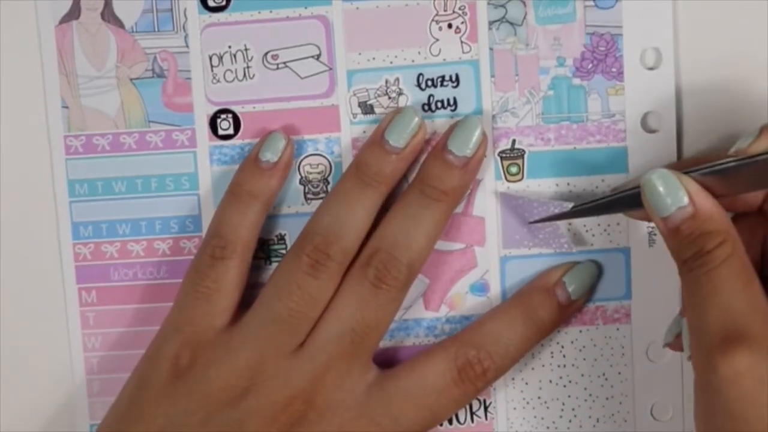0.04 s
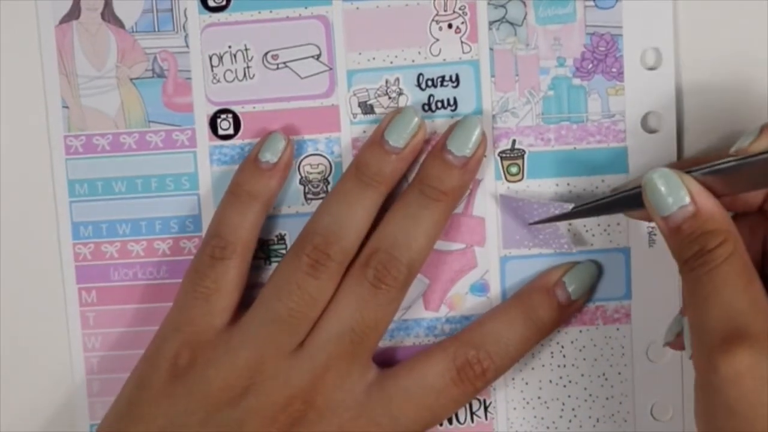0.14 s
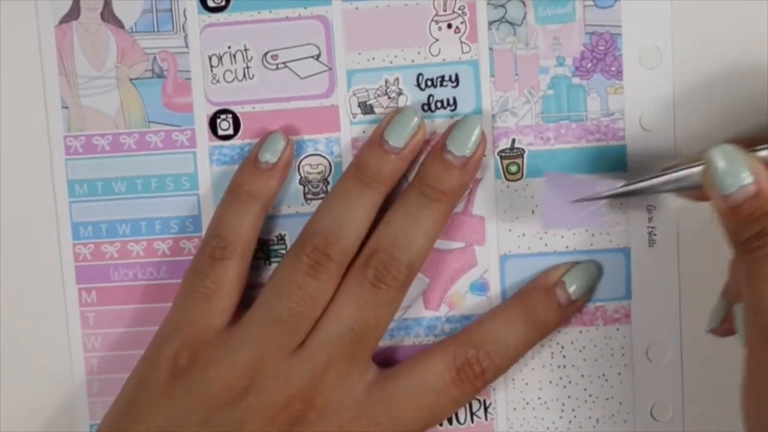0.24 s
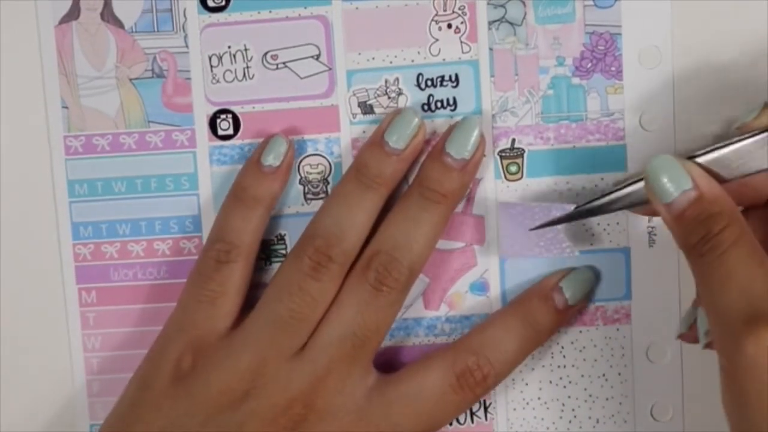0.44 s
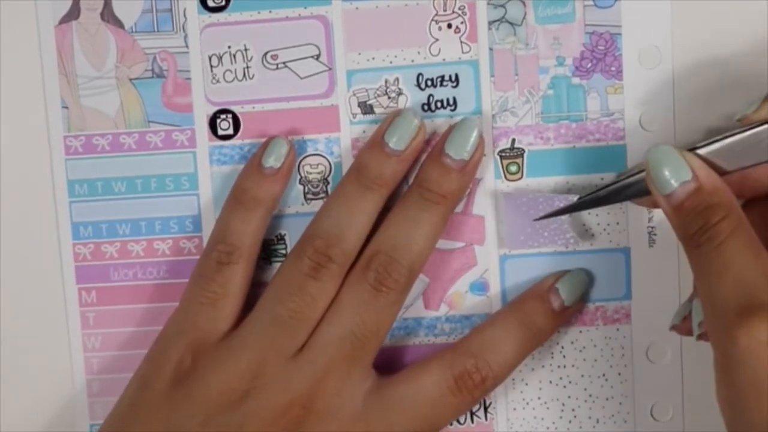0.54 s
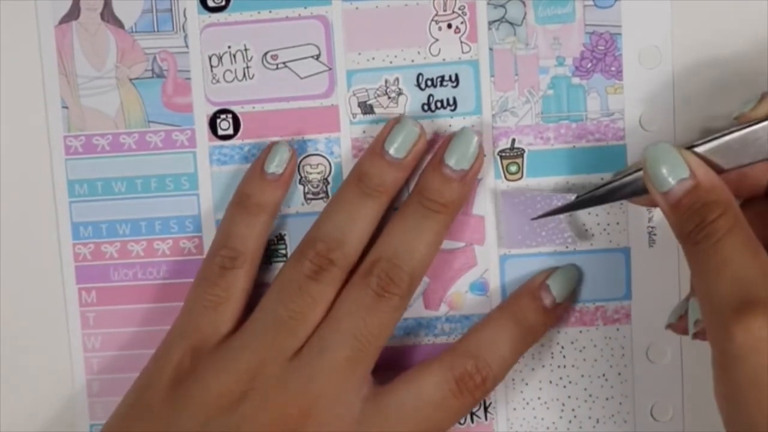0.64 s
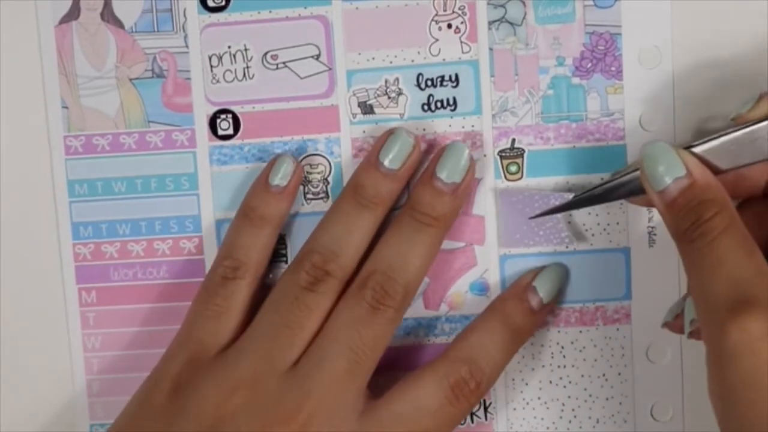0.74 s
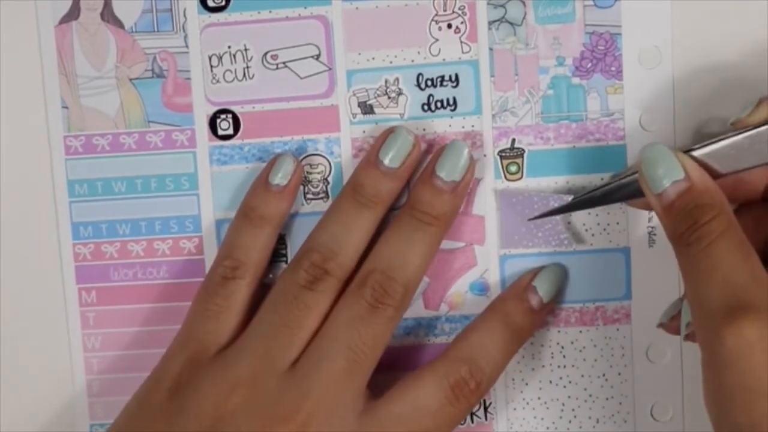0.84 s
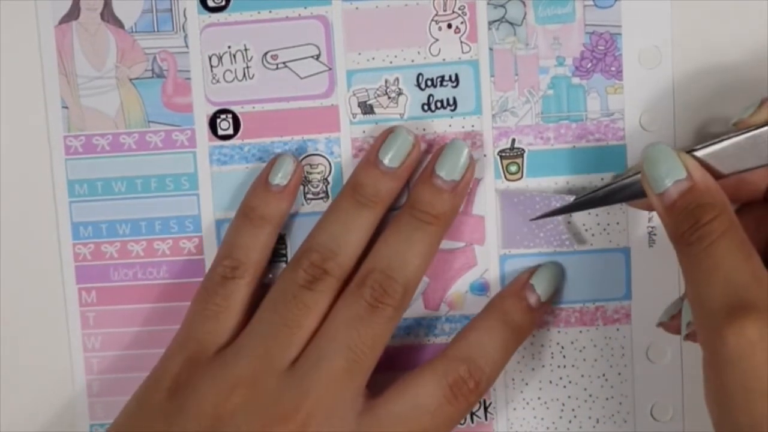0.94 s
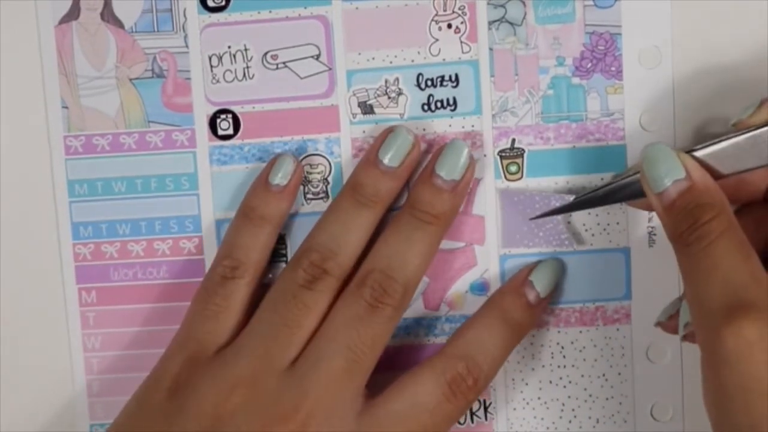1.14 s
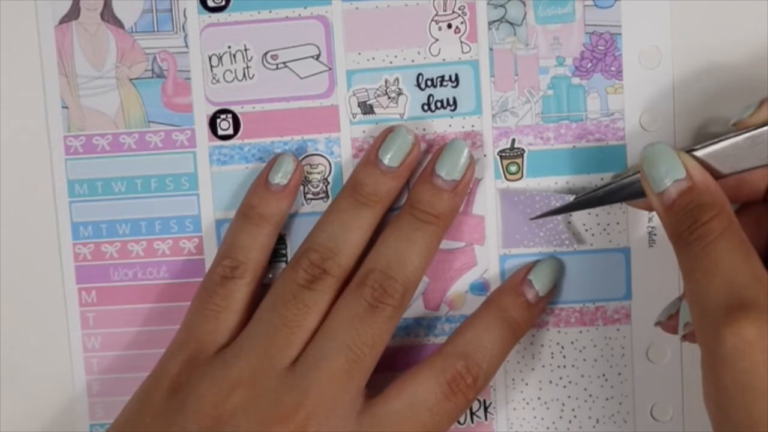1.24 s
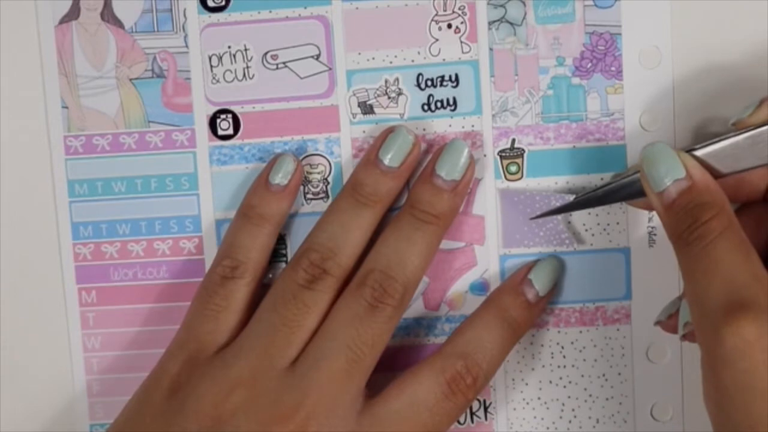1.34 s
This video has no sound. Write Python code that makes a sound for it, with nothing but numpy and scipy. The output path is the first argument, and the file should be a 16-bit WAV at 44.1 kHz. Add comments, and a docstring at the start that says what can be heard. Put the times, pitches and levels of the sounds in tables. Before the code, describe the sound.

Metal tweezers snap sharply after a sticker peels with tiny ticks and a soft rustle; the click rings briefly in a quiet room, then a faint slide and two light page taps follow, miked close.

```python
"""Tweezers and a planner sticker

Metal tweezers work a small sticker on a planner page, close to the microphone in a quiet room.
The sticker peels in tiny ticks and a rustle; one sharp, chattering snap rings the room and overloads the recorder.
Then the sticker slides with a faint squeak, the tips touch the page twice, and three fainter touches follow.
Contacts are ringing modes with noise cracks, rubs are dense noise grains; hum and hiss lie underneath."""
import sys
import numpy as np
from scipy import signal
from scipy.fft import rfft, irfft
from scipy.io import wavfile

SR = 44100
rng = np.random.default_rng(int(sys.argv[2]) if len(sys.argv) > 2 else 0)


def wrap_up_sound(samples):
    """Save the sound to the file named by the first command line argument, as 16-bit audio."""
    columns = np.atleast_2d(samples).T
    # keep every value between -1 and 1, then stretch to whole-number steps
    tamed = np.clip(columns, -1, 1)
    steps = np.round(tamed * 32767).astype(np.int16)
    wavfile.write(sys.argv[1], SR, steps)


N = 61739
TIME = np.arange(N) / SR  # s
BINS = np.maximum(np.arange(N + 1) * SR / (2 * N), 1)  # Hz, for a spectrum of 2 * N samples


def from_db(db):
    """Decibels to amplitude gain."""
    return 10 ** (np.asarray(db) / 20)


def rms_one(x):
    """Scale to unit rms over all channels."""
    return x / np.sqrt(np.mean(x ** 2) + 1e-20)


def at_hz(points, hz):
    """Read a table on a log-frequency axis."""
    freqs, values = np.transpose(points)
    return np.interp(np.log(hz), np.log(freqs), values)


def coloured(x, spectrum):
    """Filter a noise by a spectrum in dB; unit rms."""
    shaped = rfft(x, 2 * N) * from_db(at_hz(spectrum, BINS))
    return rms_one(irfft(shaped)[..., :N])


def stereo_noise(correlation):
    """White noise whose two channels have the given correlation, mixed from mid and side noises."""
    mid, side = rfft(rng.standard_normal((2, 2 * N)))
    correlation = np.clip(correlation, -1, 1)
    shared = np.sqrt(1 + correlation) * mid
    opposed = np.sqrt(1 - correlation) * side * [[1], [-1]]
    return rms_one(irfft(shared + opposed)[:, :N])


def dying(t60):
    """An exponential decay from 1, falling 60 dB in t60 seconds."""
    return np.exp(-np.log(1000) * TIME / max(t60, 1e-4))


def convolve(x, response):
    """Pass a sound through a mono or stereo response."""
    return signal.fftconvolve(np.atleast_2d(x), np.atleast_2d(response), axes=1)[:, :N]


def pan(db):
    """Channel gains for a left-minus-right level."""
    return from_db(np.array([[.5], [-.5]]) * db)


def low_cut(x, hz):
    """Second-order high-pass: small things radiate little bass."""
    sos = signal.butter(2, hz, "high", fs=SR, output="sos")
    return signal.sosfilt(sos, x + 1e-18)


def clicks(times, db):
    """One impulse for each contact."""
    out = np.zeros(N)
    samples = np.clip(np.round(times * SR).astype(int), 0, N - 1)
    np.add.at(out, samples, from_db(db))
    return out


def ringing(modes):
    """A body's modes after one unit blow: decaying sines."""
    return sum(from_db(db) * dying(t60) * np.sin(2 * np.pi * hz * TIME) for hz, db, t60 in modes)


def contacts(events, modes, crack, low_cut_hz, crack_db, crack_t60, correlation):
    """Each contact rings the body's modes and gives off a brief crack of coloured noise."""
    s, db, treble_db = np.transpose(events)
    ring = convolve(clicks(s, db), ringing(modes))
    crack_envelope = convolve(clicks(s, db + treble_db + crack_db), dying(crack_t60))
    crack_noise = coloured(stereo_noise(correlation), crack)
    return low_cut(ring + crack_envelope * crack_noise, low_cut_hz)


def rubbing(strokes, colour, grains_per_s, grain_spread_db, correlation):
    """Paper fibres catch and slip in dense tiny grains under strokes that swell and fade."""
    sizes = from_db(grain_spread_db * np.minimum(rng.exponential(1, N), 4))
    caught = rng.random(N) < grains_per_s / SR
    grains = caught * sizes * stereo_noise(correlation)
    pressure = sum(from_db(db) * np.interp(TIME, [start, top, end], [0, 1, 0])
                   for start, top, end, db in strokes)
    return pressure * coloured(grains, colour)


def snap():
    """The tweezers come free with a hard, chattering click and knock the desk."""
    # tips chattering free: start_s, level_db (of the blow), treble_db (crack only)
    chatter = [(.22838, -1, 0), (.23000, -13, 7), (.23096, -.5, -2), (.23326, -5, -1)]
    # tweezers against the page: pitch_hz, relative_level_db, t60_s
    tweezer_modes = [(1100.6, -36.5, .008), (1310, -30, .016), (2420, -23.5, 0.00807), (2780, -9.5, 0.03),
                     (3044, -10, .009), (3336, 1.5, .0045), (3760, -4, .006), (4075, -23, 0.012),
                     (5040, -28, 0.0024)]
    # spectrum of the crack: frequency_hz, relative_db_per_hz
    crack = [(200, -23.5), (700, -5), (1400, 1.5), (3500, 6), (6000, -10), (8000, -6.5), (11000, -8.5),
             (15000, -8.5)]
    # the desk's knock: pitch_hz, relative_level_db, t60_s
    desk_modes = [(280, -33.5, .25), (349, -39, 0.051)]
    click = from_db(0.08) * contacts(chatter, tweezer_modes, crack, low_cut_hz=1900,
                                     crack_db=-8.5, crack_t60=0.014, correlation=0.067)
    s, db, _ = np.transpose(chatter)
    knock = low_cut(convolve(clicks(s, db), ringing(desk_modes)), hz=230)
    return pan(-1.3) * click + knock


def peeling():
    """The glue lets go in small jerks that tick, and the lifting paper rustles."""
    # jerks of the glue: start_s, level_db (before the gain below), treble_db (crack only)
    jerks = [(.0142, -46, 0), (.0318, -32, -3), (.0630, -42, 3), (.0750, -36, -7), (.1003, -34, -3),
             (.1074, -31, -2), (.1371, -31, 0), (.1598, -38, 0), (.1617, -34, 1), (.1640, -40, 1),
             (.1775, -34, -4), (.1972, -29, 1), (.2032, -41, 0)]
    # the sticker's ring: pitch_hz, relative_level_db, t60_s
    sticker_modes = [(2838, -11, 0.018), (3700, -0.5, 0.0013), (5100, -20, 0.009)]
    # spectrum of the crack: frequency_hz, relative_db_per_hz
    crack = [(500, -13), (2000, -19), (4000, 1), (6500, -13), (8000, -3.5), (10500, -0.5), (12500, -9.5),
             (15500, -5)]
    # paper rubbing: start_s, top_s, end_s, level_db (before panning)
    strokes = [(.02, .165, 0.29, -50)]
    # spectrum of the rustle: frequency_hz, relative_db_per_hz
    colour = [(300, -15), (2000, -5.5), (2750, 9.5), (4000, -1), (6500, -8.5), (9800, 4), (12500, -17),
              (15500, -9)]
    ticks = from_db(2.0) * contacts(jerks, sticker_modes, crack, low_cut_hz=2400,
                                    crack_db=-7, crack_t60=.011, correlation=0.39)
    rustle = rubbing(strokes, colour, grains_per_s=5000, grain_spread_db=2.2, correlation=0.29)
    return pan(-1.2) * (ticks + rustle)


def placing():
    """Light touches ring the page, a faint squeak, and the sticker slides in dense grains."""
    # tips touching the page: start_s, level_db (before the gain below), treble_db (crack only)
    taps = [(.7022, -35, 1), (.7103, -32.5, -1), (.8500, -50, 0), (1.1020, -48, -2), (1.3440, -49, -3)]
    # the page on the desk: pitch_hz, relative_level_db, t60_s
    page_modes = [(308, -11, 0.064), (1020, -28, .012), (1448, -8, 0.023), (3200, -10.5, 0.0067),
                  (5260, -6.5, 0.011)]
    # spectrum of the crack: frequency_hz, relative_db_per_hz
    crack = [(300, -17), (1500, 6), (5000, 11), (10000, 2), (15000, -7)]
    # slides, then squeak, before panning: start_s, top_s, end_s, level_db
    slides = [(.61, .70, 0.77, -54.5), (.70, .72, 0.742, -50), (.72, .75, .785, -52.5)]
    squeaks = [(.635, .648, 0.686, -59.5)]
    # spectra of slide and squeak: frequency_hz, relative_db_per_hz
    slide_colour = [(200, 1), (800, 2.5), (1400, 5), (2300, 6), (3500, 11.5), (5500, 6), (8500, 4),
                    (12000, -5), (15500, -7)]
    squeak_colour = [(1500, -42), (2100, -8), (2300, 0), (2500, -20), (3400, -42)]
    touches = from_db(-1.0) * contacts(taps, page_modes, crack, low_cut_hz=67,
                                       crack_db=-5.5, crack_t60=.011, correlation=.6)
    slide = rubbing(slides, slide_colour, grains_per_s=13000, grain_spread_db=-2.5, correlation=.4)
    squeak = rubbing(squeaks, squeak_colour, grains_per_s=2200, grain_spread_db=1.5, correlation=0.48)
    return pan(-1.6) * (touches + slide + squeak)


def reflections(x):
    """Quick scatter from things on the desk, then the room's diffuse tail, dying band by band."""
    # final decay of the room: frequency_hz, t60_s
    room_t60 = [(200, 0.28), (700, 0.15), (1400, .48), (3500, 0.44), (5500, .5), (8000, .42), (14000, 0.2)]
    # gain of the tail's noise bands: frequency_hz, relative_db
    room_colour = [(100, -7), (300, 10.5), (800, 0), (1350, 5.5), (1800, 2.5), (2600, -10), (3300, 2.5),
                   (4300, -2.5), (5500, 2.5), (9000, 2), (15000, -6)]
    room_db, room_delay_s = -14.5, 0.018
    scatter_db, scatter_t60_s = -16, 0.069
    hold_s, early_decay_share = 0.092, 0.18

    fade_in = np.clip(TIME / room_delay_s, 0, 1)
    scatter = rng.standard_normal((2, N)) * dying(scatter_t60_s) * fade_in
    # the tail first lingers, dying at the early share of its final rate
    age = np.maximum(TIME - hold_s, early_decay_share * TIME)
    edges = np.geomspace(90, 18000, 13)  # Hz
    tail = 0
    for low, high in zip(edges, edges[1:]):
        hz = np.sqrt(low * high)
        sos = signal.butter(2, [low, high], "band", fs=SR, output="sos")
        band = signal.sosfilt(sos, rng.standard_normal((2, N)))
        decay = np.exp(-np.log(1000) * age / at_hz(room_t60, hz))
        tail = tail + band * from_db(at_hz(room_colour, hz)) * decay
    late = rms_one(tail * (TIME > room_delay_s))
    response = from_db(scatter_db) * rms_one(scatter) + from_db(room_db) * late
    return convolve(x, response / np.sqrt(N))  # the levels set each part's total energy


def background():
    """Room hiss, as coloured stereo noise, and a mains hum, as one sine of wavering level."""
    # spectrum of the hiss: frequency_hz, relative_db_per_hz
    room_tone = [(15, -25), (30, -14.5), (90, -13.5), (120, -11.5), (150, -10.5), (205, -13.5),
                 (280, -10.5), (410, -15), (1100, -20), (4000, -25), (9000, -28.5), (13000, -31.5),
                 (15500, -36)]
    # likeness of the two channels: frequency_hz, correlation (no unit)
    likeness = [(30, 0.55), (120, 0.52), (300, 0.33), (700, 0.13), (1500, 0.05), (5000, 0.056),
                (15000, .03)]
    # level of the hum: time_s, rms_level_db
    hum_levels = [(0, -62), (.12, -58.5), (.22, -61.5), (.46, -54.5), (.55, -66), (.72, -53), (.78, -66),
                  (.98, -59.5), (1.1, -65.5), (1.4, -63)]
    hiss_db, hum_hz = -55, 121
    hiss = from_db(hiss_db) * coloured(stereo_noise(at_hz(likeness, BINS)), room_tone)
    hum_db = np.interp(TIME, *np.transpose(hum_levels))
    hum = from_db(hum_db) * np.sqrt(2) * np.sin(2 * np.pi * hum_hz * TIME)
    return hiss + hum


def scene():
    """The handling sounds in their room."""
    handling = snap() + peeling() + placing()
    return handling + reflections(handling) + background()


def record(dry):
    """Overload past full scale adds grit but little bass; a steep filter cuts the top."""
    overload_low_cut_hz, cutoff_hz = 1500, 15400
    grit = low_cut(np.clip(dry, -1, 1) - dry, overload_low_cut_hz)
    sos = signal.ellip(10, .1, 80, cutoff_hz, fs=SR, output="sos")
    return signal.sosfilt(sos, dry + grit)


dry = scene()
out = record(dry)
wrap_up_sound(out)
```